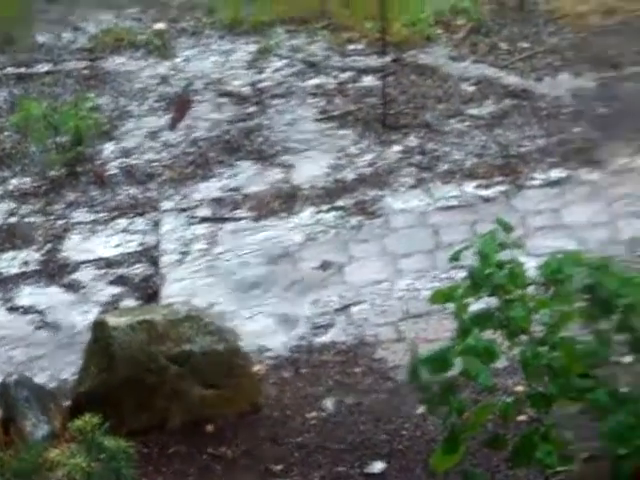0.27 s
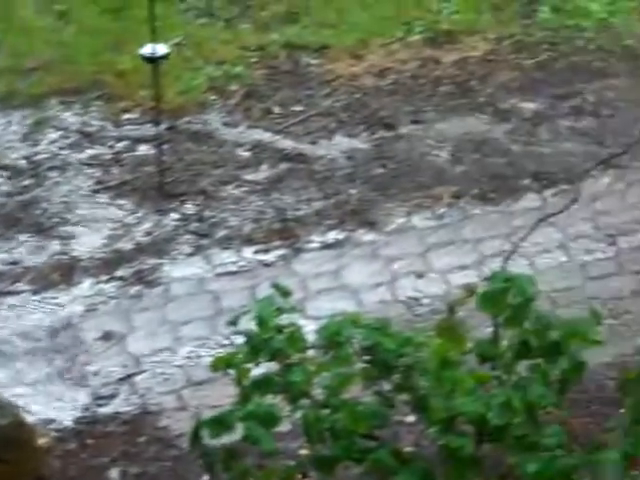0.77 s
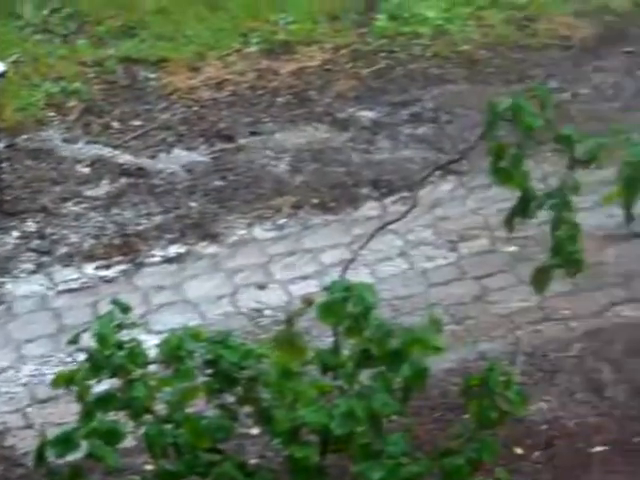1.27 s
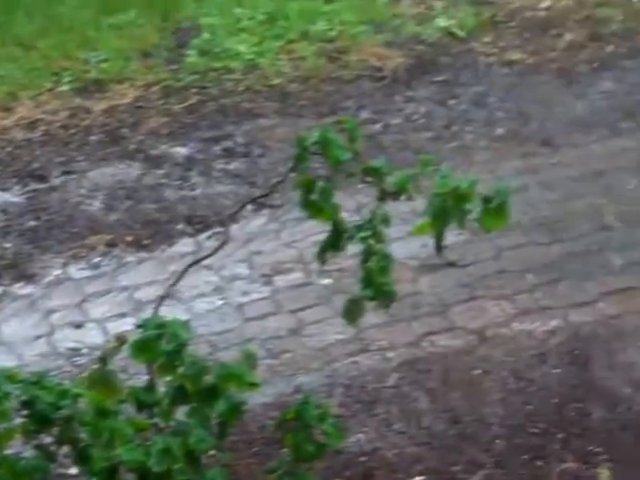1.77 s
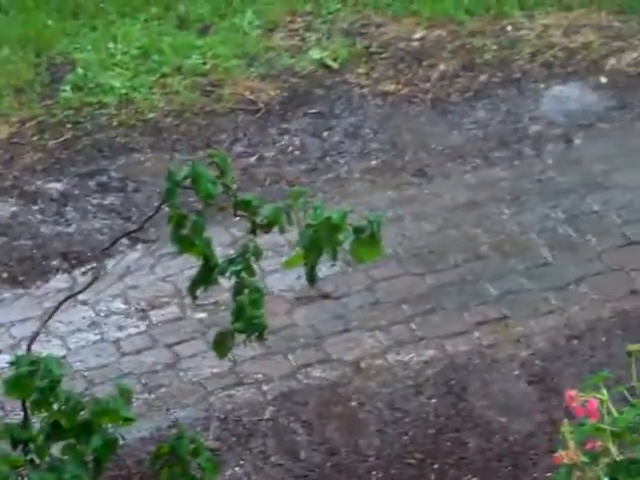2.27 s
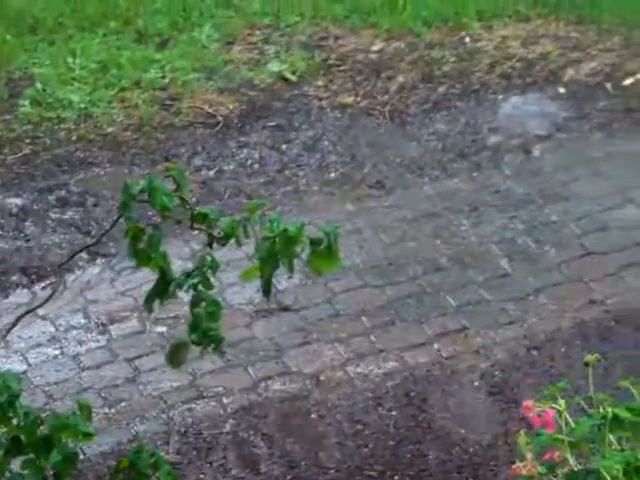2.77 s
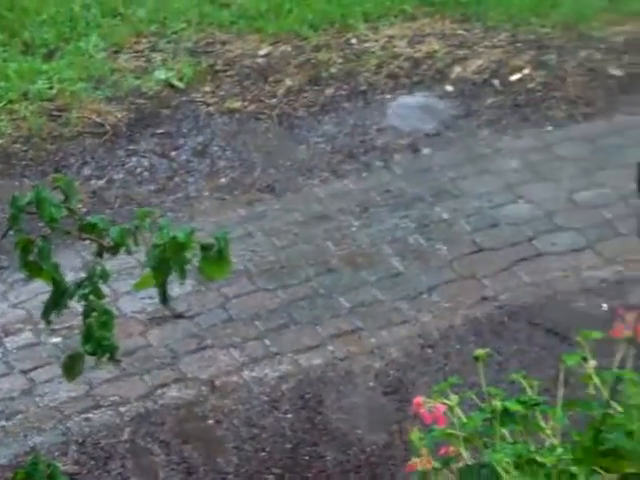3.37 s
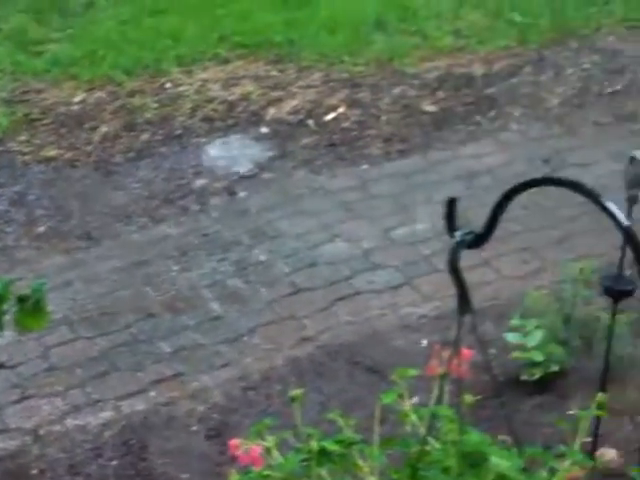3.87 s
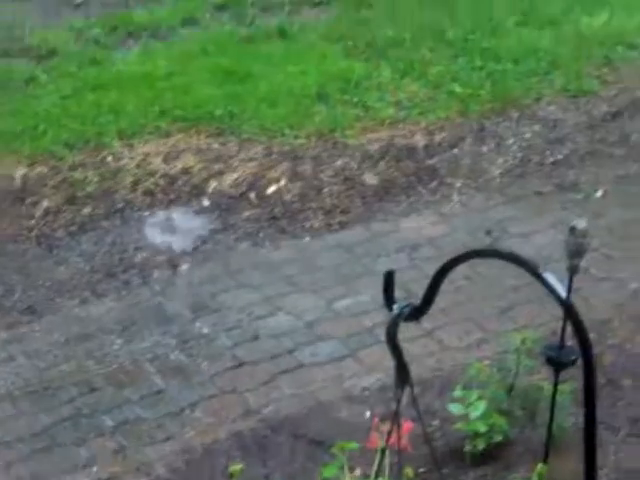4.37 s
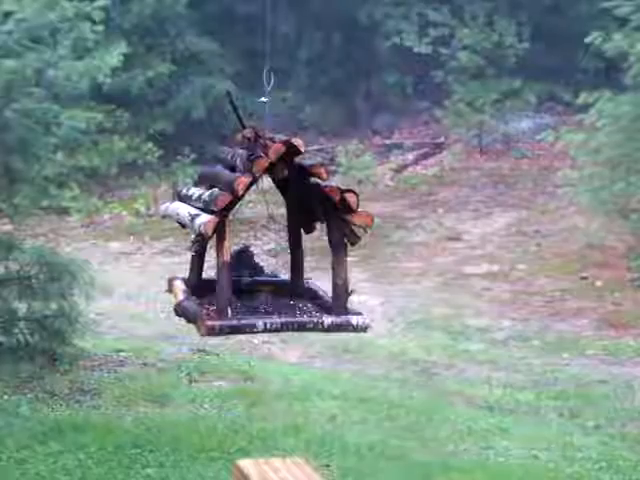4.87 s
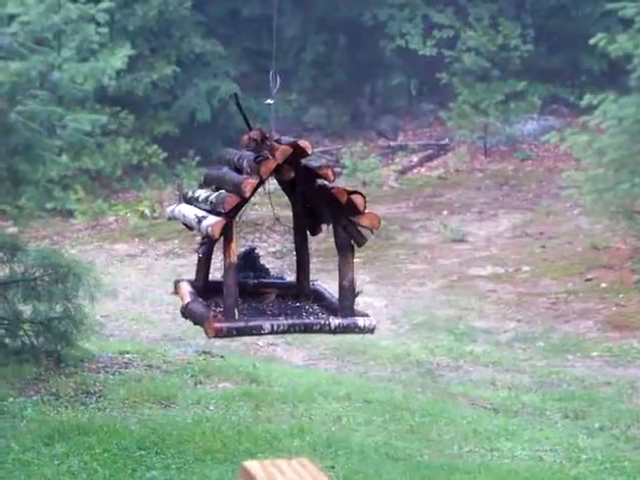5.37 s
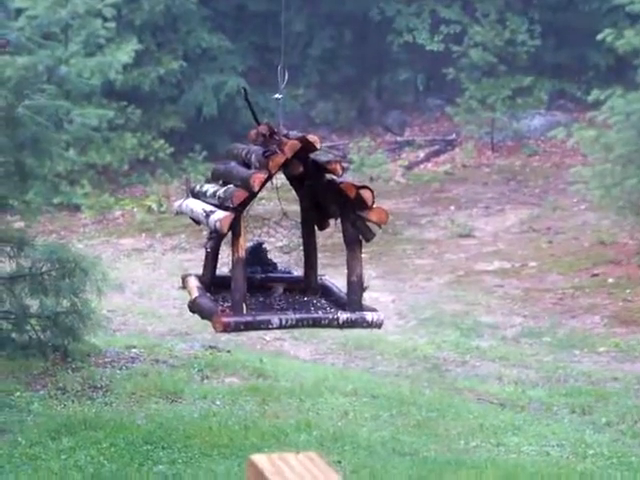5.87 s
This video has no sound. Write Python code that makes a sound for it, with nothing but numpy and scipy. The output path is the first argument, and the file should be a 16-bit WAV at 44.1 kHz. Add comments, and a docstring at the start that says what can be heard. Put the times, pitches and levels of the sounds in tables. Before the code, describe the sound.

Heavy rain pours on a back yard, a dense bright hiss made of countless drops on stone, leaves and puddles. Individual big drops smack close by with a crack, small ring and spray, slapping off the house wall. Just before five seconds the sound drops out for a fifth of a second, then returns with a pop and bigger, closer drops. Stereo camera microphones beside the house.

```python
"""Heavy rain on a back yard (paving, leaves, lawn), heard beside the house through a camera's two microphones.
Far drops merge into filtered noise; nearer ones are damped rings on stone, leaves and puddles.
The nearest smack singly, with a crack, ring, knock and spray, and reflect off the house wall.
The camera stops for a fifth of a second, then starts with a pop, facing the lawn, with bigger drops close by.
Underneath, hands on the camera make a faint rumble of low-passed noise."""
import sys
import numpy as np
from scipy import signal
from scipy.fft import rfft, irfft, next_fast_len
from scipy.io import wavfile
from scipy.ndimage import uniform_filter1d, map_coordinates

SR = 44100
rng = np.random.default_rng(int(sys.argv[2]) if len(sys.argv) > 2 else 0)


def transcribe(signal):
    """Save signal, clipped to [-1, 1], as a 16-bit WAV file at the path in sys.argv[1]."""
    frames = np.atleast_2d(signal).T
    limited = np.clip(frames, -1, 1)
    pcm = np.round(limited * 32767).astype(np.int16)
    wavfile.write(sys.argv[1], SR, pcm)


N = 269010
STOP_S, RESTART_S = 4.9035, 5.1035  # the camera is silent between these times


def amp(db):
    """Level: decibels become an amplitude ratio."""
    return 10 ** (np.asarray(db) / 20)


def unit(x):
    """Normalisation: scale the signal to an rms of 1, both channels together."""
    return x / np.sqrt(np.mean(x ** 2) + 1e-20)


def along(points, hz, axis=1):
    """Spectral envelope: interpolate one column of (f/Hz, value, ..) on a log-frequency axis."""
    table = np.transpose(points)
    return np.interp(np.log(hz + 1), np.log(table[0] + 1), table[axis])


def wobble(rate):
    """Slow random modulation: a smooth curve through random knots, rate of them per second."""
    knots = rng.standard_normal(int(N * rate / SR) + 4)
    return map_coordinates(knots, [np.arange(N) * rate / SR])


def filtered(x, response):
    """Linear filtering: multiply the spectrum by a complex response of frequency."""
    m = next_fast_len(N + SR // 2)  # zero padding
    return irfft(rfft(x, m) * response(np.fft.rfftfreq(m, 1 / SR)), m)[..., :N]


PORT_DELAY_S = .00029  # sound's travel time from one microphone to the other


def splashes(start, gain, ring_hz, t60, bearing, size, rise_s=0):
    """Damped oscillation with interaural-style delay: bearing -1 reaches the left first, 1 the right."""
    pair = []
    for side in (1, -1):  # left, right
        arrival = (start + side * bearing * PORT_DELAY_S / 2)[:, None]
        index = np.ceil(arrival * SR).astype(int) + np.arange(size)
        t = index / SR - arrival
        decay = np.exp(-np.log(1000) * t / t60[:, None])
        ring = decay * np.cos(2 * np.pi * ring_hz[:, None] * t)
        if rise_s:
            ring = ring * (1 - np.exp(-t / rise_s))
        weighted = gain(side)[:, None] * ring
        summed = np.bincount(np.clip(index, 0, N).ravel(), weighted.ravel(), N + 1)
        pair.append(summed[:N])
    return np.array(pair)


# relative colour of the rain: f/Hz, level per Hz/dB
RAIN_COLOUR = [(30, -40.5), (70, -24), (140, -14.5), (250, -11.5), (400, -8.5), (540, -7), (700, -7),
               (1200, -6), (2000, -4), (2750, -3.1), (3300, -1.85), (3800, -4), (4600, -3), (5400, -2.5),
               (5900, -4.5), (6700, -4.5), (7100, -6.5), (7400, -14.5), (7700, -12.5)]
# difference in colour between the microphones: f/Hz, left minus right level/dB
MICROPHONE_DIFFERENCE = [(100, -8.5), (400, -6.5), (1000, -3.5), (1500, -3), (2000, 3.5), (2600, 6.5),
                         (3250, 10.5), (3900, 2.5), (5300, 5), (7000, 3)]
# change of colour when facing the lawn: f/Hz, left level/dB, right level/dB
LAWN_COLOUR = [(100, 4, 4), (450, 1, 1.5), (1100, 2, 1.5), (2100, 1, 4), (2600, 1, 0.5), (3370, 0, 3),
               (4220, -2, -3), (5000, -2.5, 0.5), (7000, -1, -1.5)]
LEFT_LEAD_S = .00004  # the open yard lies a little to the left
RAIN_DB, EASE_DB_PER_S = -17.5, 0.0968  # starting level; fainter as the camera turns from the paving


def rain():
    """Superposition: far wash, ticks on stone, duller taps on leaves and puddle pings swell together."""
    ticks = patter(count=4000, low_hz=2000, high_hz=7500, t60=.002, spread_db=8, size=128)
    taps = patter(count=1200, low_hz=500, high_hz=3600, t60=.005, spread_db=10.5, size=384)
    pings = patter(count=600, low_hz=3100, high_hz=3500, t60=.011, spread_db=12, size=1024)
    far = wash(patchy_db=.6)
    mixed = far + amp(-9) * ticks + amp(-17.0) * taps + amp(-23.5) * pings
    side = np.array([[.5], [-.5]])  # left, right

    def colour(hz):
        level_db = along(RAIN_COLOUR, hz) + side * along(MICROPHONE_DIFFERENCE, hz)
        return amp(level_db) * np.exp(2j * np.pi * hz * side * LEFT_LEAD_S)

    def lawn(hz):
        return amp([along(LAWN_COLOUR, hz, axis=1), along(LAWN_COLOUR, hz, axis=2)])

    paving_view = filtered(mixed, colour)
    lawn_view = filtered(paving_view, lawn)
    t = np.arange(N) / SR
    swell_db = 0.15 * wobble(2.3) + 0.22 * wobble(22)  # slow swells and a quicker flutter
    level_db = RAIN_DB - EASE_DB_PER_S * t + swell_db
    return amp(level_db) * unit(np.where(t > STOP_S, lawn_view, paving_view))


def patter(count, low_hz, high_hz, t60, spread_db, size):
    """Random impulsive excitation: drops at random times, places and pitches; closer ones stand out."""
    when, pitch, place, life, shade, nearness = rng.random((count, 6)).T

    def gain(side):
        return amp(spread_db * nearness ** 2 + side * 7.5 * (shade - 1.0))  # stronger at the right

    ring_hz = low_hz + (high_hz - low_hz) * pitch
    bearing = 2 * place - 1
    return unit(splashes(when * N / SR, gain, ring_hz, t60 * (.5 + life), bearing, size))


def wash(patchy_db):
    """Diffuse field: countless far drops merge into noise, coherent between microphones mainly in the bass."""
    z = signal.stft(rng.standard_normal((2, N)), nperseg=512)[2]
    field = uniform_filter1d(rng.standard_normal(z.shape[1:]), size=9, axis=0)  # over frequency
    field = uniform_filter1d(field, size=7, axis=1)  # over time
    pair = signal.istft(z * amp(patchy_db * unit(field)), nperseg=512)[1][:, :N]

    def mid_side(hz):
        coherence = np.clip(0.1 + 0.85 * np.exp(-(hz / 1300) ** 3), 0, 1)
        angle = np.arccos(coherence) / 2
        return np.array([np.cos(angle), np.sin(angle)])

    mid, side = filtered(pair, mid_side)
    return unit(np.array([mid + side, mid - side]))


# the biggest drops beside the camera, levels before panning and rise:
# t/s, crack level/dB, ring level/dB, ring f/Hz, knock level/dB, spray level/dB, wall echo delay/s
BIGGEST_DROPS = [(.0406, -6, -8.5, 2750, -13, -17, .0068), (.0902, -3, -9, 3130, -19, -17, .0052),
                 (.1465, -9, -16, 3200, -28, -15, .005), (.3011, -4, -18, 3300, -24, -19, .0059),
                 (.3127, -6, -13, 3300, -17, -15, .0053), (.4919, -8, -15, 3200, -16, -11.5, .0054),
                 (.661, -8, -14, 2860, -20, -16, .0045), (.7427, -7, -14, 3100, -24, -20, .005),
                 (.9693, -5, -15, 3450, -26, -19, .0058), (.9803, -8, -8.5, 3400, -19, -14, .0045),
                 (1.045, -9, -9, 3130, -26, -16, .005), (1.1132, -9, -18, 3300, -28, -16, .005),
                 (1.1436, -6, -12, 3100, -16, -17, .0058), (1.2205, -11, -17, 3200, -16, -16, .0045),
                 (1.3135, -6, -14, 3730, -24, -19, .005), (1.336, -6, -13, 2700, -24, -18, .005),
                 (1.358, -8, -18, 3300, -28, -15, .005), (1.385, -7, -12, 3300, -26, -17, .005),
                 (1.5212, -12, -10, 3450, -26, -20, .005), (1.8177, -4, -18, 3500, -26, -18, .0052),
                 (1.9009, -9, -8, 3250, -16, -17, .0052), (2.1032, -2, -15, 3100, -22, -19, .0055),
                 (2.4045, -6, -8.5, 3070, -13.5, -16, .005), (2.5007, -8, -22, 3300, -28, -15, .005),
                 (2.7667, -6, -22, 3300, -28, -13.5, .005), (2.9595, -10, -11, 3250, -21, -19, .007),
                 (3.0917, -9, -11, 3400, -28, -19, .005), (3.3265, -9, -13, 3200, -28, -16, .005),
                 (3.3372, -5, -16, 2970, -24, -20, .005), (3.4769, -2, -26, 3300, -26, -17, .0047),
                 (3.629, -6, -15, 3000, -13.5, -16, .005), (4.2105, -7, -13, 3100, -20, -17, .0046),
                 (4.2626, -6, -14, 2640, -24, -19, .005), (4.6563, -8, -13, 3000, -21, -17, .005),
                 (5.1758, -5, -18, 3120, -26, -20, .005), (5.19, 2.5, -4.5, 2950, -4.5, -10.5, .0046),
                 (5.2973, -2, -17, 3500, -17, -18, .0047), (5.3168, -2, -19, 2900, -26, -15, .0046),
                 (5.3952, -6, -22, 3200, -21, -16, .005), (5.4354, 0, -17, 3300, -28, -14.5, .0046),
                 (5.4558, -7, -17, 3200, -22, -15, .005), (5.6183, -6, -18, 3200, -24, -20, .008),
                 (5.6262, -4, -8.5, 3450, -18, -14.5, .0048), (5.6358, -13, -13, 3100, -26, -21, .005),
                 (5.6771, -11, -11, 3140, -24, -21, .005), (5.7717, .5, -12, 3460, -17, -17, .0046),
                 (5.938, -3, -15, 3100, -22, -19, .0047)]
DROP_PAN_DB = 2.5  # near drops are louder at the left by this much
# pitches scatter from drop to drop, in octaves
CRACK_HZ, CRACK_SCATTER_OCT, CRACK_T60_S = 5200, .08, .0014
KNOCK_HZ, KNOCK_SCATTER_OCT, KNOCK_T60_S = 1700, .06, .0075
RING_T60_S = .0085
RING_LAG_S, KNOCK_LAG_S = .0002, .0007  # after the crack
# wall echo against the direct sound; the crack's is smeared by a longer decay
ECHO_DB, ECHO_T60_S, BODY_ECHO_DB = -2, .0019, -6
CRACK_RISE_S, BODY_RISE_S = .00003, .00013  # time constants: water lands softly
# spray: how long droplets keep landing, how much the last ones fade, pitch range, ring
SPRAY_S, SPRAY_FADE_DB, DROPLET_T60_S = .014, 5, .0034
DROPLET_LOW_HZ, DROPLET_HIGH_HZ = 2700, 6800


def near_drops(lesser_count, droplets):
    """Impact and reflection: crack, ring and knock, each returned by the house wall, then a direct spray."""
    drops = np.vstack([BIGGEST_DROPS, lesser_drops(lesser_count)])
    s, crack_db, ring_db, ring_hz, knock_db, spray_db, echo_s = np.transpose(drops)
    bearing, each = rng.uniform(-0.019, 0.08, len(s)), np.ones(len(s))

    def panned(db):
        return lambda side: amp(db + side * DROP_PAN_DB / 2)

    def crack(at, db, t60):
        return splashes(at, panned(db), crack_hz, t60 * each, bearing, size=128, rise_s=CRACK_RISE_S)

    def body(lag_s, level_db, hz, t60):
        paths = [(s, 0), (s + echo_s, BODY_ECHO_DB)]  # direct, and off the wall
        return sum(splashes(at + lag_s, panned(level_db + db), hz, t60 * each, bearing,
                            size=512, rise_s=BODY_RISE_S) for at, db in paths)

    crack_hz = CRACK_HZ * 2 ** rng.normal(0, CRACK_SCATTER_OCT, len(s))
    cracks = crack(s, crack_db, CRACK_T60_S)
    echoes = crack(s + echo_s, crack_db + ECHO_DB, ECHO_T60_S)
    knock_hz = KNOCK_HZ * 2 ** rng.normal(0, KNOCK_SCATTER_OCT, len(s))
    rings = body(RING_LAG_S, ring_db, ring_hz, RING_T60_S)
    knocks = body(KNOCK_LAG_S, knock_db, knock_hz, KNOCK_T60_S)
    # the droplets land within milliseconds, the late ones weaker
    parent = np.repeat(np.arange(len(s)), droplets)
    flight, pitch, place = rng.random((len(parent), 3)).T
    droplet_db = spray_db[parent] - SPRAY_FADE_DB * flight
    droplet_hz = DROPLET_LOW_HZ * (DROPLET_HIGH_HZ / DROPLET_LOW_HZ) ** pitch
    spray = splashes(s[parent] + SPRAY_S * flight, panned(droplet_db), droplet_hz,
                     DROPLET_T60_S * each[parent], place - .5, size=256, rise_s=CRACK_RISE_S)
    return cracks + echoes + rings + knocks + spray


# ranges for the lesser near drops: lowest, highest; one row each for
# crack level/dB, ring level/dB, ring f/Hz, knock level/dB, spray level/dB, wall echo delay/s
LESSER_RANGES = [(-19, -13), (-26, -17), (3050, 3550), (-32, -21), (-22, -16), (.0044, .006)]


def lesser_drops(count):
    """Uniform random arrivals: rows like those of the biggest drops, for smaller ones landing by chance."""
    when, *shares = rng.random((count, 1 + len(LESSER_RANGES))).T
    columns = [low + (high - low) * share for (low, high), share in zip(LESSER_RANGES, shares)]
    return np.transpose([when * N / SR] + columns)


# nudges of the camera: t/s, peak rumble level/dB
CAMERA_NUDGES = [(1.47, -59), (3.67, -58), (4.66, -45), (4.83, -40.5), (5.16, -58), (5.79, -54),
                 (5.95, -60)]
HOLD_DB, HOLD_DB_PER_S = -71, 0.8  # the steady rumble grows as the camera pans
NUDGE_ATTACK_S, NUDGE_RELEASE_S = .025, 0.03  # time constants


def handling():
    """Structure-borne noise: hands shake the camera's body, partly shared by both microphones."""
    shake = rng.standard_normal(N) + 0.89 * rng.standard_normal((2, N))
    # f/Hz, relative level/dB
    colour = [(15, -1.5), (45, -8.5), (110, -11.5), (300, -54.5), (1000, -120)]
    rumble = filtered(shake, lambda hz: amp(along(colour, hz)))
    t = np.arange(N) / SR
    nudges = 0
    for s, db in CAMERA_NUDGES:
        distance = np.maximum((s - t) / NUDGE_ATTACK_S, (t - s) / NUDGE_RELEASE_S)
        nudges = nudges + amp(db) * np.exp(-distance)
    return (amp(HOLD_DB + HOLD_DB_PER_S * t) + nudges) * unit(rumble)


def scene():
    """Superposition: everything that reaches the microphones adds."""
    return rain() + near_drops(lesser_count=30, droplets=18) + handling()


# the pop on restarting, a soft push and a small click: delay t/s, pulse scale level/dB, time constant t/s
RESTART_PULSES = [(0, -15.5, .0013), (.0009, -14.5, .00011)]


def restart_pop():
    """Transient response: a low push and a click as the sound comes back on, each with a small rebound."""
    since = np.arange(N) / SR - RESTART_S

    def push(u):
        return u * np.exp(1 - u) * (1 - u / 4)  # negative beyond u = 4: the rebound

    return sum(amp(db) * push(np.maximum(since - delay, 0) / decay) for delay, db, decay in RESTART_PULSES)


# narrow dips in the camera's response: centre f/Hz, width f/Hz, level at the centre/dB
CAMERA_NOTCHES = [(299.6, 148, -19.5), (966, 41, -14)]
FADE_OUT_S = .001
TREBLE_HZ, OVERLOAD, TOP_HZ = 7680, .88, 16000  # treble limit, clipping amplitude, limit of its harmonics


def record(dry):
    """Band limiting and clipping: two notches, a silent gap, a steep treble limit, then overload on peaks."""
    t = np.arange(N) / SR

    def notches(hz):
        dips = [1 - (1 - amp(db)) * 1j * hz * width / (centre ** 2 - hz ** 2 + 1j * hz * width)
                for centre, width, db in CAMERA_NOTCHES]
        return np.prod(dips, axis=0)

    notched = filtered(dry, notches)
    wake_s, fade_in_s = np.array([[.006], [0]]), np.array([[.008], [.002]])  # left, right
    before = np.clip((STOP_S - t) / FADE_OUT_S, 0, 1)
    after = np.clip((t - RESTART_S - wake_s) / fade_in_s, 0, 1)
    sound = notched * (before + after) + restart_pop()
    dulled = filtered(sound, lambda hz: 1 / np.sqrt(1 + (hz / TREBLE_HZ) ** 120))
    clipped = np.clip(dulled, -OVERLOAD, OVERLOAD)
    return filtered(clipped, lambda hz: hz < TOP_HZ)


dry = scene()
out = record(dry)
transcribe(out)
```